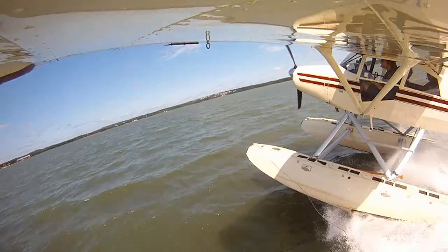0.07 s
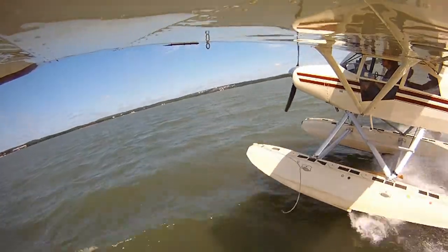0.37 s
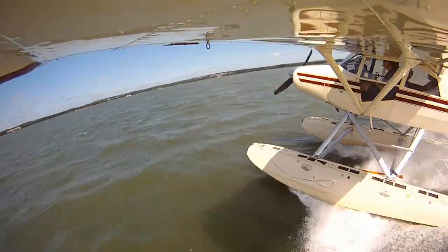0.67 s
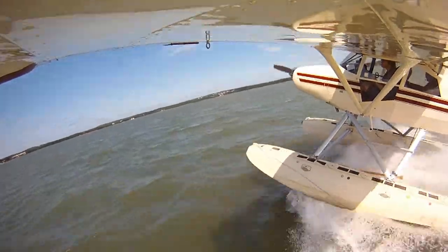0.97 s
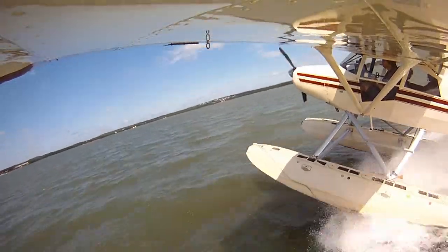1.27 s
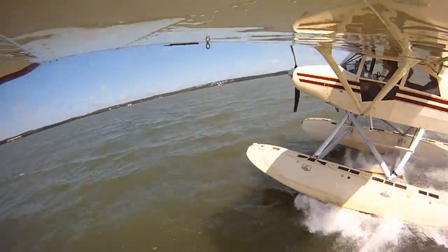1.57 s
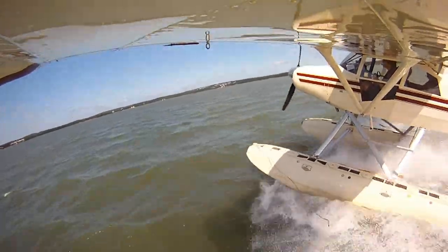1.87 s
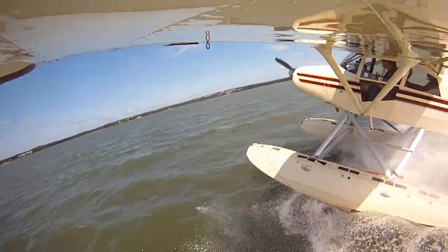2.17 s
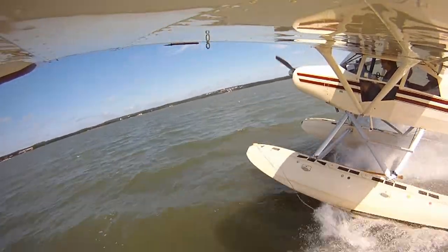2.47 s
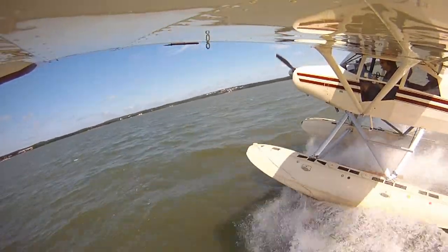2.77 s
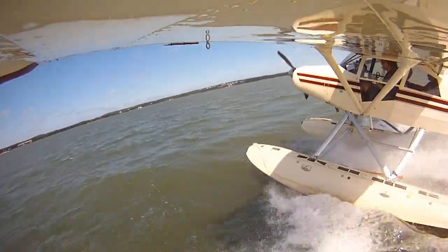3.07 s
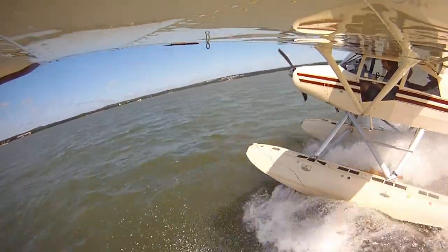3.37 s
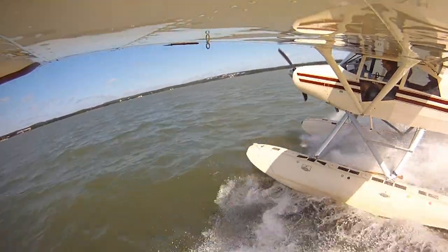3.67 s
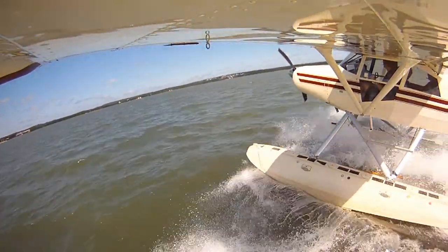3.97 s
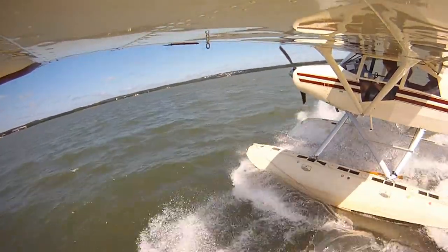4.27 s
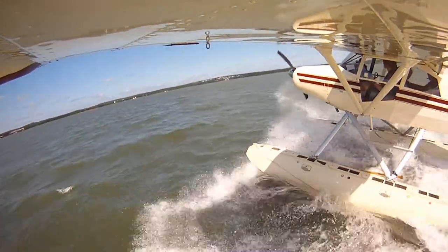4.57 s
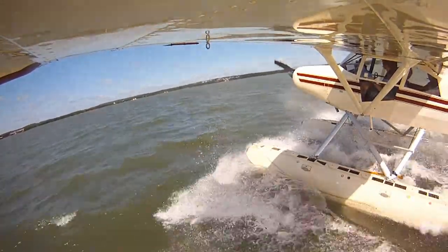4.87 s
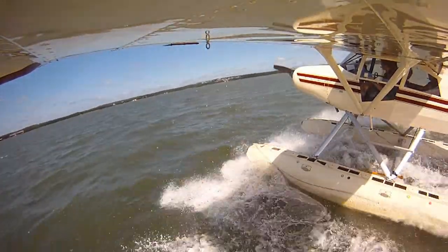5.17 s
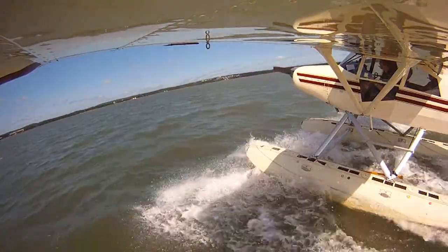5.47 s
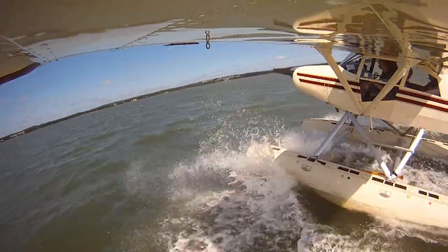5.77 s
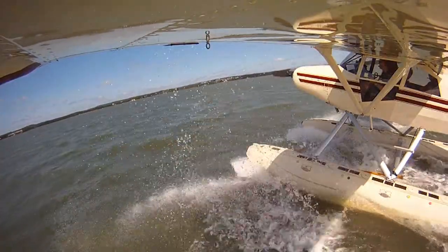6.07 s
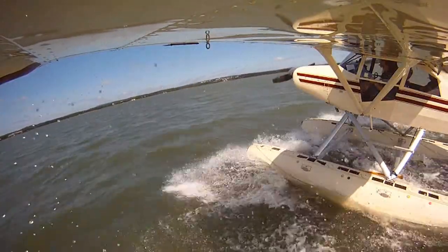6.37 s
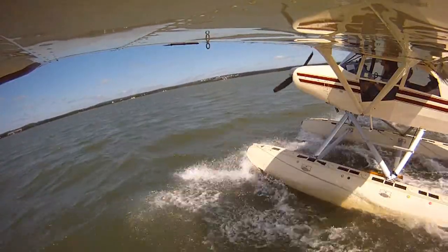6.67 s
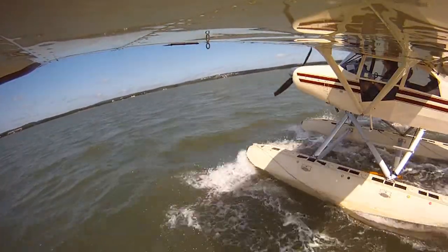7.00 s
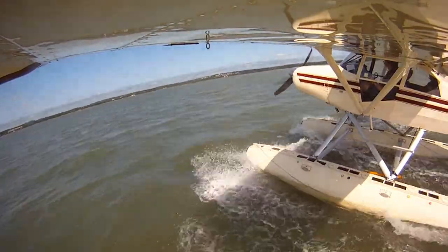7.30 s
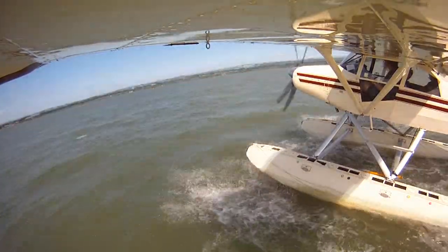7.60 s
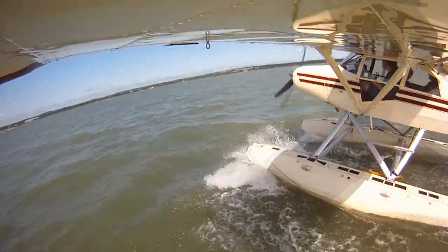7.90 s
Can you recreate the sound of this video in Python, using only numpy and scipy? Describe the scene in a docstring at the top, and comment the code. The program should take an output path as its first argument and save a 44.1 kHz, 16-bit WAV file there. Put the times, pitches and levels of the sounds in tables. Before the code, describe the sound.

A floatplane taxis fast over choppy water. Spray hisses in ragged surges as the floats hit each wave, with sharp smacks, dull thumps and churning water. The wing rumbles and hums in the wind while the engine drones steadily underneath. Near the end the engine grows a little louder and loose metal rattles lightly. The microphone sits in a case under the wing, making the water sound boxy with a glassy fizz.

```python
"""Spray hisses and waves slam as a floatplane taxis fast over choppy water.
The floats throw a sheet at each wave; the wing booms and hums with the pounding and the wind.
Underneath, the engine drones and clatters at a steady speed; loose metal rattles near the end.
The water is heard through a camera case under the wing. Sample-and-hold adds a glassy fizz."""
import sys
import numpy as np
from scipy import signal
from scipy.fft import rfft, irfft
from scipy.io import wavfile
from scipy.ndimage import uniform_filter1d

SR = 44100
rng = np.random.default_rng(int(sys.argv[2]) if len(sys.argv) > 2 else 0)


def transcribe(signal):
    """Save signal, clipped to [-1, 1], as a 16-bit WAV file at the path in sys.argv[1]."""
    frames = np.atleast_2d(signal).T
    limited = np.clip(frames, -1, 1)
    pcm = np.round(limited * 32767).astype(np.int16)
    wavfile.write(sys.argv[1], SR, pcm)


N = 354563
TIME_S, FREQ_HZ = np.arange(N) / SR, np.fft.rfftfreq(N, 1 / SR)
SHAFT_HZ, BLADES = 14.83, 3


def from_db(db):
    """Decibels to gain."""
    return 10 ** (np.asarray(db) / 20)


def unit_rms(x):
    """Scales to rms 1."""
    return x / np.sqrt(np.mean(x ** 2) + 1e-20)


def curves(rows):
    """Each column after time_s, interpolated to every sample."""
    time_s, *columns = np.transpose(rows)
    return [np.interp(TIME_S, time_s, column) for column in columns]


def swell(start_s, rise_s, hold_s, decay_s):
    """Linear rise, hold, exponential decay."""
    age_s = TIME_S - start_s
    return np.clip(age_s / rise_s, 0, 1) * np.exp(-np.maximum(age_s - rise_s - hold_s, 0) / decay_s)


def coloured(x, gain):
    """Filters x by a gain per bin; rms 1."""
    return unit_rms(irfft(rfft(x) * gain, N))


def noise(gain):
    """Filtered Gaussian noise, rms 1."""
    return coloured(rng.standard_normal(N), gain)


def wander(hz):
    """Random drift up to about hz, rms 1."""
    return noise(FREQ_HZ / (FREQ_HZ + hz / 10) / (1 + (FREQ_HZ / hz) ** 4))


def resonances(modes):
    """Gain per bin of steep-skirted modes, summed in power."""
    peaks = (from_db(db) / (1 + ((FREQ_HZ - hz) / (0.74 * width_hz)) ** 2) for hz, width_hz, db in modes)
    return np.sqrt(sum(peak ** 2 for peak in peaks))


def drops(per_s, spread_db):
    """Random impacts, most small, a few large; rms 1."""
    size = from_db(spread_db * np.minimum(rng.exponential(1, N), 5))
    return unit_rms(size * rng.choice([-1, 1], N) * (rng.random(N) < per_s / SR))


# Case resonances and one notch: centre_hz, width_hz, lift_db
CASE_BANDS = [(338, 38, -6.5), (392, 52, 2), (501, 118, 5.5), (774, 74, 8.5), (1027, 250, 5.5),
              (1428, 72, 3.5), (2115, 460, 3.5), (2425, 120, 2.5), (3612, 424, 8), (4950, 260, 6)]
def through_case(spectrum):
    """Gain per bin of a smooth spectrum heard through the camera case."""
    hz, db = np.transpose(spectrum)
    lift_db = sum(peak_db * np.exp2(-(2 * (FREQ_HZ - centre_hz) / width_hz) ** 2)
                  for centre_hz, width_hz, peak_db in CASE_BANDS)
    return from_db(np.interp(np.log(FREQ_HZ + 1), np.log(hz), db) + lift_db)


# Engine loudness: time_s, drone_db, clatter_db
ENGINE_LEVELS = [(0, -0.5, -45), (2, -4, -62), (4, -4.5, -68), (5.5, -5.5, -49), (6.8, -4, -43.5),
                 (7.3, 0, -42), (8.04, 2.5, -47)]
# Drone harmonics, the third from the blades: cycles_per_turn, level_db
SHAFT_ORDERS = [(1, -40), (2, -42), (3, -25.5), (4, -34), (9, -28.5), (12, -29)]
# Clatter resonances: centre_hz, width_hz, level_db
CLATTER_MODES = [(790, 37, 15), (1060, 270, 6), (2550, 260, 1), (3690, 350, 2), (5380, 120, -2.5)]
def engine(waver_db=1.25, uneven_db=1.3, sharpness=1.5):
    """Shaft harmonics drone; clatter beats three times a turn, one beat stronger."""
    drone_db, clatter_db = curves(ENGINE_LEVELS)
    angle = 2 * np.pi * np.cumsum(SHAFT_HZ * (1 + 0.0011 * wander(hz=2.4))) / SR
    drone = np.zeros(N)
    for order, db in SHAFT_ORDERS:
        amplitude = np.sqrt(2) * from_db(db + waver_db * wander(hz=3.4))
        drone += amplitude * np.sin(order * angle + 2 * np.pi * rng.random())
    beats = np.exp(sharpness * np.cos(BLADES * angle) + np.cos(angle))
    force = rng.standard_normal(N) * beats * from_db(uneven_db * wander(hz=24.7))
    clatter = coloured(force, resonances(CLATTER_MODES))
    return from_db(drone_db) * drone + from_db(clatter_db) * clatter


# Loose metal: pitch_hz, typical_level_db
LOOSE_METAL = [(2520, -35.5), (3650, -39)]
def light_rattles(from_s=5.8, chance=0.35, spread_db=3, detune=0.026):
    """Engine beats shake loose parts at random; returns rows of start_s, pitch_hz, level_db."""
    beats_s = np.arange(0, N / SR, 1 / (BLADES * SHAFT_HZ))
    rows = []
    for hz, db in LOOSE_METAL:
        shaken = (rng.random(len(beats_s)) < chance) & (beats_s > from_s)
        pitch, size = rng.standard_normal((2, len(beats_s)))
        rows += list(np.transpose([beats_s, hz * (1 + detune * pitch), db + spread_db * size])[shaken])
    return rows


# Loudest rattles: start_s, pitch_hz, level_db
LOUD_RATTLES = [(6.02, 2460, -25), (6.132, 3660, -32), (6.288, 3650, -30), (6.826, 3530, -27),
                (7.070, 3730, -28), (7.276, 2626, -29.5), (7.481, 2610, -27), (7.675, 2520, -23.5)]
def rattles(gain_db=-2, rise_s=0.0036, scatter=0.027):
    """Loose metal buzzes briefly at an unsteady pitch."""
    out = np.zeros(N)
    unsteady = 1 + scatter * wander(hz=500)
    for start_s, hz, db in list(LOUD_RATTLES) + light_rattles():
        active = (TIME_S >= start_s) & (TIME_S < start_s + 20 * rise_s)
        rises = (TIME_S[active] - start_s) / rise_s
        ring = np.sin(2 * np.pi * np.cumsum(hz * unsteady[active]) / SR)
        out[active] += from_db(db + gain_db) * rises * np.exp(1 - rises) * ring
    return out


# Wing tone: time_s, pitch_hz, level_db
WING_HUM = [(0, 53.6, -26), (.22, 56.2, -19), (.45, 57.2, -16), (.65, 57.55, -31), (1.2, 58.45, -34),
            (1.36, 58.17, -20), (1.6, 56.05, -18.5), (1.9, 58.5, -22), (2.5, 57, -21.5), (3.75, 60, -22),
            (4.5, 59.5, -23), (5.1, 59, -26), (5.7, 59.24, -22.5), (6.3, 58.5, -31.5), (6.75, 57, -18),
            (6.96, 52, -34), (7.2, 54, -19.5), (7.6, 55.46, -17), (8.04, 57.52, -15.5)]
def wing_hum(waver_db=1, drift=0.0085):
    """Airflow keeps the wing swinging at one slowly moving pitch."""
    pitch_hz, level_db = curves(WING_HUM)
    cycles = np.cumsum(pitch_hz * (1 + drift * wander(hz=7.2))) / SR
    return from_db(level_db + waver_db * wander(hz=12)) * np.sqrt(2) * np.sin(2 * np.pi * cycles)


# Wing bending: centre_hz, width_hz, level_db
WING_MODES = [(22, 20.12, -4), (46, 27, -2.5), (58.3, 8.6, 4.5), (75.6, 36.8, -12.5)]
# Struts and wing skin: centre_hz, width_hz, level_db
SKIN_MODES = [(115.2, 10.5, -1), (123.4, 8.8, 0), (134.7, 11, 1), (175.8, 11.8, -1), (187, 23, -6),
              (218, 113, -21.5)]
# Shaking by wind and chop: time_s, wing_db, skin_db
SHAKE_LEVELS = [(0, -23, -21), (.8, -16, -21), (1.15, -22, -22.5), (1.5, -20, -23.5), (2.6, -16, -24),
                (3.2, -17, -20.5), (3.8, -21.5, -22), (4.3, -12, -24), (4.7, -20, -20.5),
                (5.1, -18.5, -29.5), (5.45, -23, -25.5), (5.8, -18, -20.5), (6.4, -21, -28),
                (6.85, -19.5, -31.5), (7.05, -14, -19), (8.04, -21, -24)]
# Brief swells in the low drumming: start_s, level_db
DRUMMING_SWELLS = [(.05, -13.5), (.65, -14), (.76, -16), (.97, -14), (1.122, -15), (1.24, -14.5),
                   (1.78, -18.5), (2.03, -20.5), (2.31, -15.5), (3.04, -16.5), (3.28, -22), (3.48, -21),
                   (3.7, -16.5), (3.9, -19), (4.371, -19.5), (4.63, -16), (5.55, -14), (5.68, -19),
                   (5.98, -22)]
def airframe(boom_gain_db=-5, damping=0.44):
    """Wind and chop make the wing boom; struts and skin drum, swelling briefly now and then."""
    wing_db, skin_db = curves(SHAKE_LEVELS)
    swell_power = sum((from_db(db) * swell(start_s, rise_s=0.022, hold_s=0, decay_s=0.043)) ** 2
                      for start_s, db in DRUMMING_SWELLS)
    drumming = np.sqrt(from_db(skin_db) ** 2 + swell_power)
    out = np.zeros(N)
    for modes, force in (WING_MODES, from_db(wing_db + boom_gain_db)), (SKIN_MODES, drumming):
        ring = noise(resonances(modes))
        power = abs(uniform_filter1d(ring ** 2, size=4000)) + 1e-3
        out += force * unit_rms(ring / power ** damping)  # wide swings are damped harder
    return out


# Jolts: centre_s, level_db, polarity (push +1, pull -1)
WING_JOLTS = [(0.664, -4, 1), (0.979, -9, 1), (1.342, -5, -1), (1.628, -4, -1), (1.976, -4, 1),
              (2.234, -2, 1), (2.938, -9, -1), (4.414, -6, 1), (5.723, -4, -1), (7.184, -5, 1)]
def jolts(gain_db=-4, width_s=0.002):
    """Each jolt through the wing is one short, dull pressure swing."""
    out = np.zeros(N)
    for centre_s, db, polarity in WING_JOLTS:
        near = abs(TIME_S - centre_s) < 10 * width_s
        widths = (TIME_S[near] - centre_s) / width_s
        out[near] += polarity * from_db(db + gain_db) * (1 - widths ** 2) * np.exp(-widths ** 2 / 2)
    return out


# Churn under the floats: time_s, level_db
CHURN_LEVELS = [(0, -26), (.2, -32), (.6, -31), (.76, -23), (.88, -30), (1.2, -37), (1.47, -44.5),
                (1.6, -34), (1.88, -29), (2, -38.5), (2.45, -39), (2.75, -47.5), (3.08, -40.5),
                (4.25, -44.5), (4.62, -39), (4.8, -44), (5.4, -43.5), (5.55, -35.5), (5.9, -43.5),
                (6.95, -46.5), (7.05, -36), (8.04, -39.5)]
# Churn spectrum: freq_hz, density_db
CHURN_SPECTRUM = [(120, 3), (270, 5.5), (350, 2), (500, 1.5), (700, -4), (1200, -13), (2200, -9),
                  (3200, -27.5), (6000, -46)]
def churn(gain_db=1, gulp_db=1.73):
    """Water pushed aside by the floats roars dully."""
    level_db, = curves(CHURN_LEVELS)
    envelope = from_db(gain_db + level_db + gulp_db * wander(hz=30.7))
    return envelope * noise(through_case(CHURN_SPECTRUM))


# Sheets landing: start_s, level_db
WATER_SMACKS = [(0.062, -25.5), (0.688, -24.5), (0.7324, -29), (0.999, -29), (1.272, -23), (1.515, -26),
                (2.9251, -23), (3.077, -27), (4.1235, -29), (5.2606, -31), (5.4801, -22), (5.6325, -24),
                (5.6624, -23.5), (6.3305, -26), (6.7381, -24), (7.0115, -29)]
# Smack and drop spectrum: freq_hz, density_db
IMPACT_SPECTRUM = [(200, -24), (900, -40), (2400, 24), (3200, 12.5), (5500, 7), (7000, 11)]
def smacks(gain_db=-4, crack_s=0.0045, patter_s=0.0094, patter_db=-11):
    """A sheet of water lands with a crack and a short patter."""
    force = np.zeros(N)
    for start_s, db in WATER_SMACKS:
        after = TIME_S >= start_s
        age_s = TIME_S[after] - start_s
        decay = np.exp(-age_s / crack_s) + from_db(patter_db) * np.exp(-age_s / patter_s)
        force[after] += from_db(db + gain_db) * decay
    return force * noise(through_case(IMPACT_SPECTRUM))


def drop_ticks(mist_db):
    """Single large drops out of the mist tap the case."""
    return from_db(mist_db) * coloured(drops(per_s=18, spread_db=0.5), through_case(IMPACT_SPECTRUM))


# Bursting waves: start_s, rise_s, decay_s, level_db
BOW_SLAMS = [(.655, 0.096, 0.12, -26), (2.905, 0.024, 0.019, -30.5), (5.476, .008, .05, -28),
             (5.632, .035, .025, -35), (6.431, .018, 0.034, -25.5), (7.01, 0.0038, 0.11, -34)]
# Slam spectrum: freq_hz, density_db
SLAM_SPECTRUM = [(150, -26), (330, 2), (700, 1), (1200, 2.5), (2200, 2), (2800, -44), (3500, -12),
                 (6000, -37)]
def slams():
    """Waves burst under the bow with a hollow whoosh."""
    force = sum(from_db(db) * swell(start_s, rise_s, 0, decay_s)
                for start_s, rise_s, decay_s, db in BOW_SLAMS)
    return force * noise(through_case(SLAM_SPECTRUM))


# Steady wash along the floats: time_s, spray_db, mist_db
FLOAT_WASH = [(0, -38.5, -54), (.6, -37, -60.5), (1.1, -39, -57.5), (2, -41, -57.5), (2.7, -38.5, -52.5),
              (3.1, -40.5, -56.5), (3.7, -35.5, -49), (4.45, -39.5, -54), (5.2, -41, -52.5),
              (5.7, -40.5, -58.5), (6.4, -36.5, -50.5), (6.95, -38, -57.5), (8.04, -38.5, -56)]
# One sheet per wave cut: start_s, length_s, spray_db, mist_db, growth_db
WAVE_SHEETS = [(0.01, .28, -40.5, -70, 10), (0.363, 0.11, -47, -64, 11), (0.657, .32, -35.5, -61, 0),
               (1.198, 0.15, -35.5, -51.5, -10), (1.326, .21, -38, -57, 8), (1.68, 0.29, -39.5, -68, -5),
               (2.036, .19, -39, -60, 12), (2.325, 0.32, -38.5, -54.5, 3), (2.751, 0.27, -35, -51.5, 6),
               (3.189, .18, -37.5, -53, -6), (3.475, 0.24, -42, -63, 20), (3.809, 0.38, -32, -47.5, -1.5),
               (4.505, 0.21, -35, -54.5, -3.5), (4.736, .83, -33.5, -52, -0.5),
               (5.633, 0.066, -29.5, -54, -2), (5.766, 0.61, -38, -58, 2), (6.541, .19, -40.5, -58, -4),
               (7, 0.24, -38, -49, -4), (7.25, 0.75, -44, -56.5, -8)]
def thrown_water_db(rise_s=0.027, decay_s=0.018):
    """Spray and mist levels: the wash plus sheets that grow or fade through a wave, then collapse."""
    power = from_db(curves(FLOAT_WASH)) ** 2
    for start_s, length_s, spray_db, mist_db, growth_db in WAVE_SHEETS:
        progress = np.clip((TIME_S - start_s) / length_s, 0, 1)
        sheet = swell(start_s, rise_s, length_s - rise_s, decay_s) * from_db(growth_db * (progress - 0.5))
        power += (from_db([[spray_db], [mist_db]]) * sheet) ** 2
    return 10 * np.log10(power)


def shower(level_db, spectrum, band_hz, grain, flicker_db):
    """Countless drops hiss, larger ones among them; level_db applies within band_hz."""
    water = unit_rms(rng.standard_normal(N) + grain * drops(per_s=1500, spread_db=3.5))
    gain = through_case(spectrum)
    in_band = (FREQ_HZ > band_hz[0]) & (FREQ_HZ < band_hz[1])
    band_share = np.sum(gain[in_band] ** 2) / np.sum(gain ** 2)
    return from_db(level_db + flicker_db * wander(hz=50)) * coloured(water, gain) / np.sqrt(band_share)


# Heavy spray and fine mist spectra: freq_hz, density_db
SPRAY_SPECTRUM = [(200, -10.5), (550, -9), (900, -0.5), (1700, 2), (2150, 2.5), (2550, 0), (3100, -10.5),
                  (4200, -21), (6500, -38)]
MIST_SPECTRUM = [(400, -23), (1000, -13), (1800, -2), (2600, 14.5), (3100, 1), (4200, 1), (5500, 3),
                 (6500, -2)]
def spray(spray_db, mist_db, heavy_gain_db=-1.1, ragged_db=1):
    """Heavy spray and fine mist leave the floats in the same ragged sheets."""
    heavy = shower(spray_db, SPRAY_SPECTRUM, band_hz=(860, 2390), grain=0.4, flicker_db=0.98)
    mist = shower(mist_db, MIST_SPECTRUM, band_hz=(4470, 5170), grain=0.74, flicker_db=0.75)
    return (from_db(heavy_gain_db) * heavy + mist) * from_db(ragged_db * wander(hz=21.8))


def scene():
    """Water, airframe and engine at one microphone, on two identical channels."""
    spray_db, mist_db = thrown_water_db()
    water = spray(spray_db, mist_db) + churn() + slams() + smacks() + drop_ticks(mist_db)
    mono = water + airframe() + wing_hum() + jolts() + engine() + rattles()
    return np.array([mono, mono])


def record(dry, corner_hz=5680, hold_hz=12000, fizz_db=1, edge_hz=15270):
    """Sample-and-hold mirrors the low-passed sound around hold_hz as fizz; the top is cut at edge_hz."""
    faded = dry * signal.windows.tukey(N, 0.001)
    band = irfft(rfft(faded) / np.sqrt(1 + (FREQ_HZ / corner_hz) ** 50), N)
    mirrored = band * (1 + 2 * from_db(fizz_db) * np.cos(2 * np.pi * hold_hz * TIME_S))
    held = irfft(rfft(mirrored) * np.sinc(FREQ_HZ / hold_hz), N)
    lowpass = signal.firwin(511, edge_hz, window=("kaiser", 9), fs=SR)
    return signal.oaconvolve(held, lowpass[None], "same")


dry = scene()
out = record(dry)
transcribe(out)
```